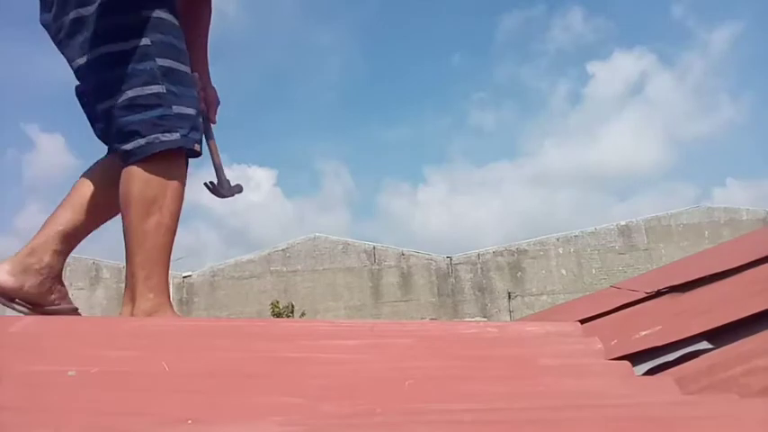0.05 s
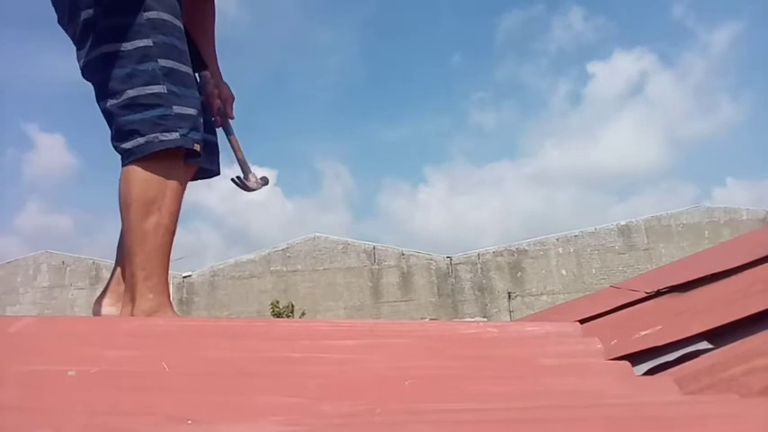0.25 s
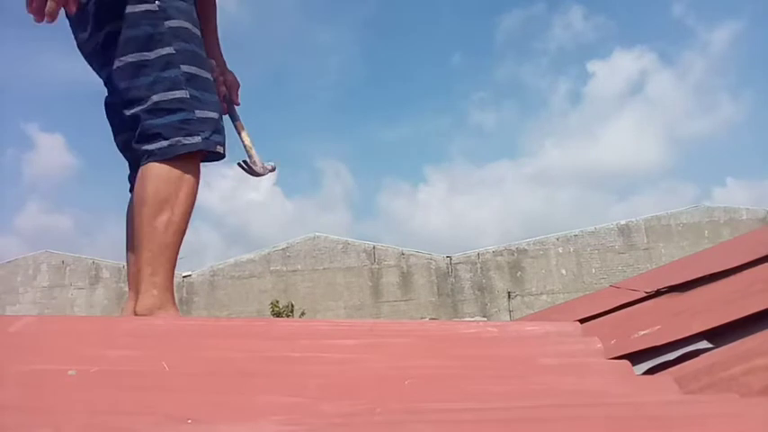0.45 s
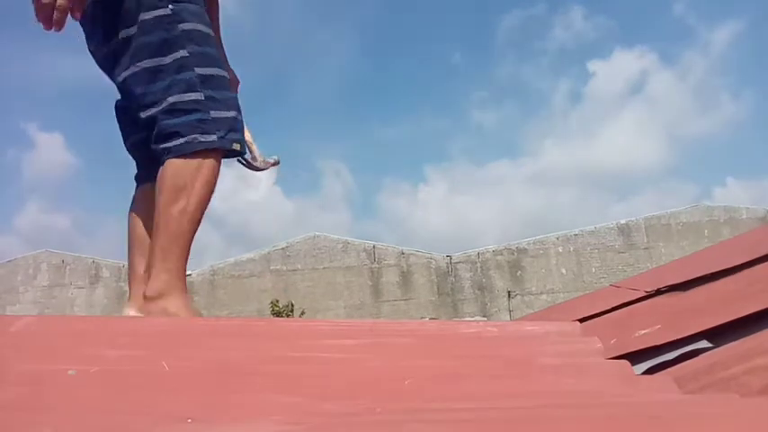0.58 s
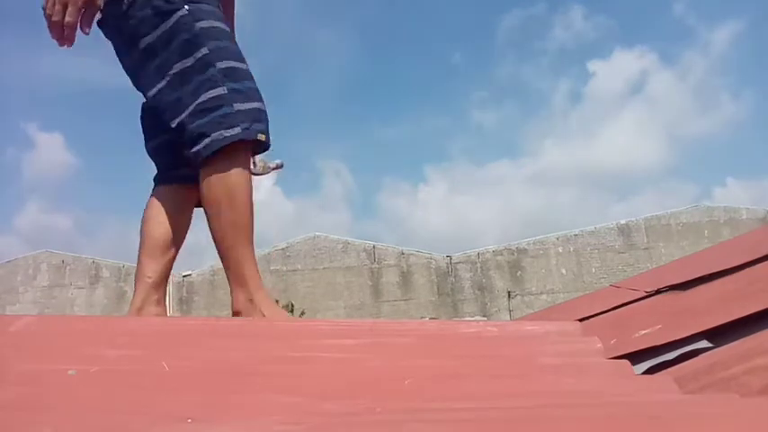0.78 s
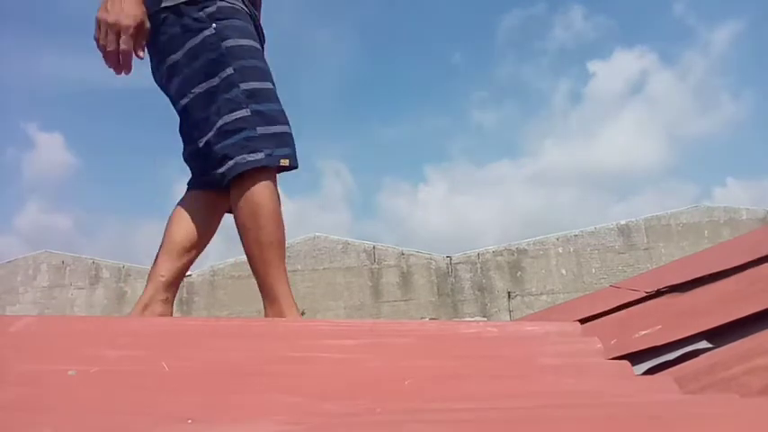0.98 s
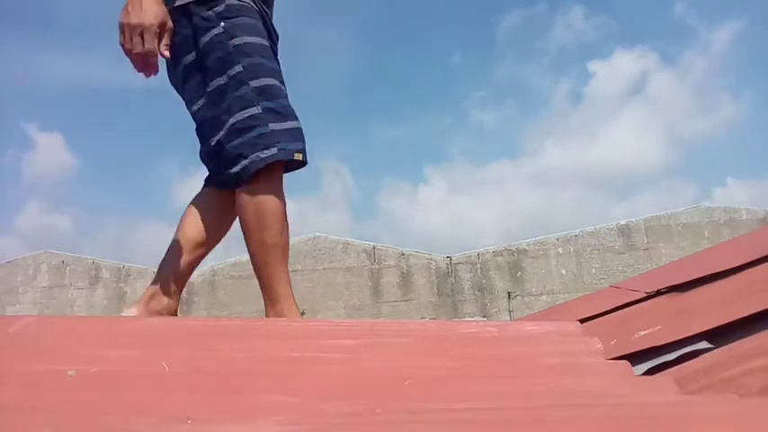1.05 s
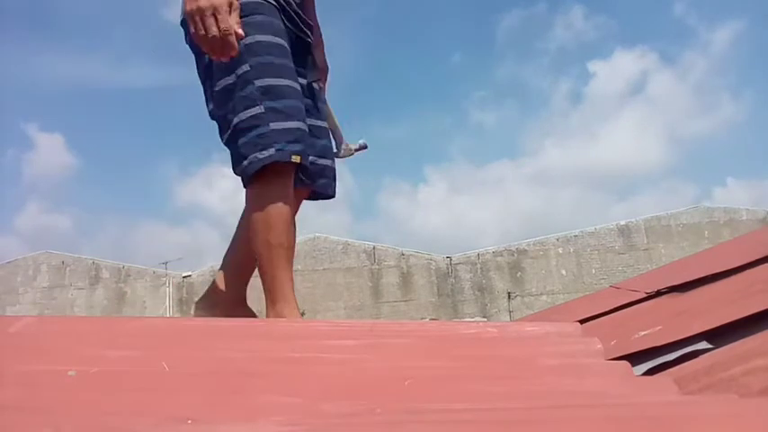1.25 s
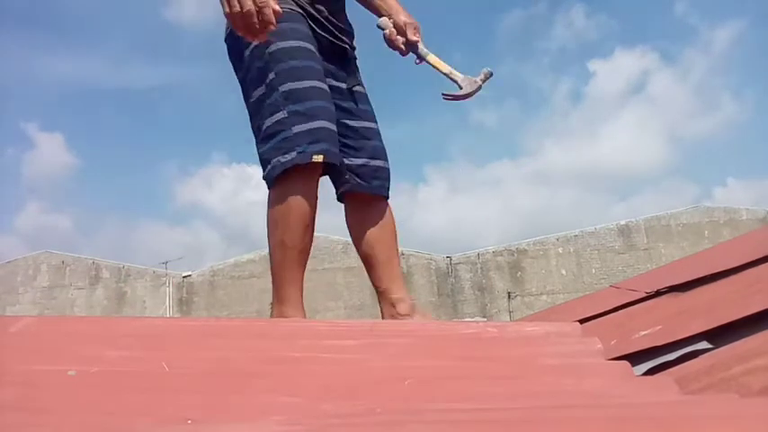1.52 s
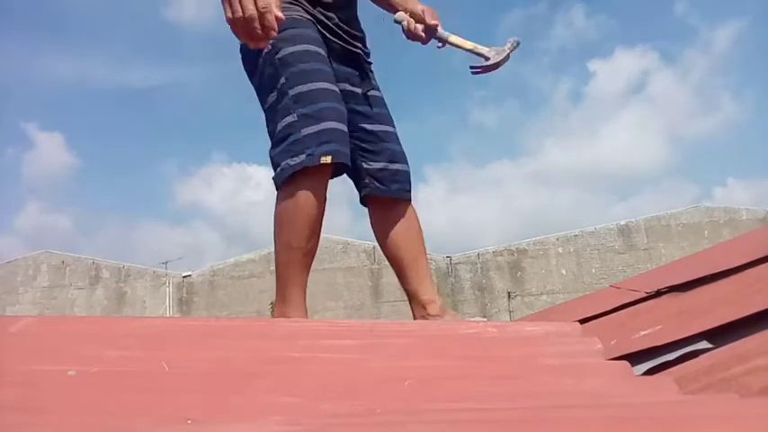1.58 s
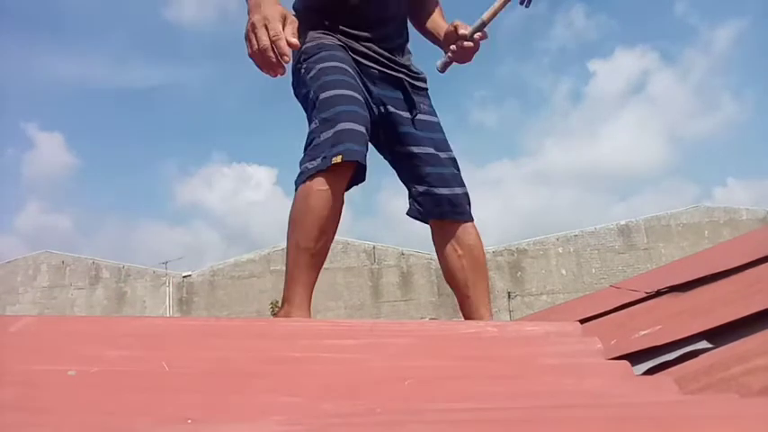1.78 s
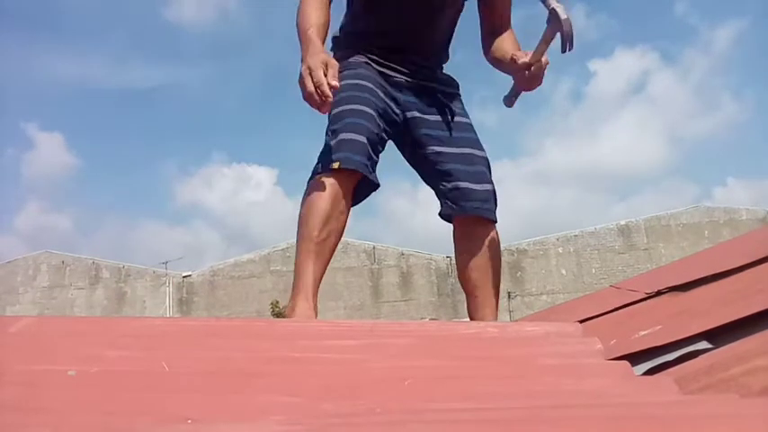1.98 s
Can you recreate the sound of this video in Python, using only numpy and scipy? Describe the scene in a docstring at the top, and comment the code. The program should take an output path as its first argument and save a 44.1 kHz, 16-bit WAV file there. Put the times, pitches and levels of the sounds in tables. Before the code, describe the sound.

A sheet-metal roof bangs under a barefoot man's weight outdoors. Faint distant birds and a brief whine come first. From about 0.2 to 0.8 seconds the sheets buckle in loud, rattling bangs and hollow pops. Softer steps tick and knock from 0.9 to 1.6 seconds, with another faint chirp. A heavy step booms around 1.7, and a scrape swells near 2 seconds. A low rumble and faint hum continue throughout.

```python
"""A barefoot man walks over a sheet-metal roof outdoors. At first far birds and a brief whine sound over
a low rumble and a faint hum, which last throughout. Then the sheets buckle under his weight in a run of
loud, rattling bangs and hollow pops, each blow exciting the metal's crowded modes. Softer steps follow,
ticking, knocking and brushing the sheet. A bird calls again, a heavy step booms in the low modes of the
frame, and at the end a scrape swells."""
import sys
import numpy as np
from scipy import signal
from scipy.fft import rfft, irfft, next_fast_len
from scipy.io import wavfile

SR = 44100
rng = np.random.default_rng(int(sys.argv[2]) if len(sys.argv) > 2 else 0)


def wav_record(signal):
    """Record a signal, one row per channel, as 16-bit PCM in the file named by sys.argv[1]."""
    frames = np.transpose(np.atleast_2d(signal))
    bounded = np.clip(frames, -1, 1)
    # unit amplitude maps onto the largest positive 16-bit level
    quanta = np.round(bounded * 32767).astype(np.int16)
    wavfile.write(sys.argv[1], SR, quanta)


N = 90404
RING_SIZE = 44100  # samples given to each blow

# buckling of the sheets: start_s, level_db, bass_db, treble_db, rattle_s
BANGS = [(0.236, -17, 6.5, 7, 0.0046), (0.2435, -15.5, 6.5, 7, 0.0024), (0.2545, -13, -8.5, 2.5, 0.0041),
         (0.274, -18.5, -11.5, -1.5, .005), (0.3165, -25, -1.5, -1, 0.02), (0.3538, -11.5, -4.5, 2, 0.0033),
         (0.362, -15, -13, -8, 0.0018), (0.4065, -17, -10, 0, 0.014), (0.4545, -20.5, 1.5, 15, 0.0053),
         (0.4605, -9, -18, -8, 0.0055), (0.474, -14.5, -10.5, -5, 0.01),
         (0.5255, -13.5, -14.5, -2.5, 0.013), (0.5832, -12, -7, -13.5, 0.0013),
         (0.612, -19.5, -7, -11, 0.0011), (0.6897, -18, -1.5, -9, 0.0033), (0.697, -28.5, -3, -1, 0.006),
         (0.7385, -24, 2, -32, 0.002)]
# soft footfalls and creaks: start_s, level_db, bass_db, treble_db, rattle_s
STEPS = [(0.917, -48, 10, -7, 0.0042), (0.95, -43, 9.5, 1, 0.028), (0.9925, -25.5, -2.5, -19, 0.0043),
         (1.143, -40.5, 16.5, 7, 0.01), (1.167, -24.5, -11.5, -12.5, 0.011), (1.278, -41, 11, -23, 0.015),
         (1.3815, -39, 6.5, -28, 0.003), (1.556, -46.5, 7, -13.5, 0.0026)]
# heavy step over the frame: start_s, level_db, bass_db, treble_db, rattle_s, weight_db
THUDS = [(1.683, -35, 0, -11, 0.014, -33.5), (1.6965, -31.5, 1.5, -8.5, 0.016, -22.5),
         (1.7505, -29, 5.5, 0, 0.0022, -32), (1.772, -38.5, -4.5, 5, 0.0071, -33.5)]
# spectral envelope of each kind of blow: frequency_hz, gain_db
BANG_COLOUR = [(30, -34), (130, -9.5), (280, -9.5), (400, 0), (800, 2), (1450, 0.5), (2500, -6),
               (3400, -13), (4200, -20.5), (7000, -35.5), (8800, -36.5), (10500, -51), (15500, -53)]
STEP_COLOUR = [(40, -34), (130, -8), (270, -12), (450, 2.5), (1300, -4.5), (4000, -29), (6000, -50.5),
               (15000, -82)]
THUD_COLOUR = [(35, -35), (72, -5.5), (220, -5.5), (900, -6), (2000, -16.5), (3300, -29), (5500, -60.5),
               (15000, -94)]
# prominent modes of the sheet: pitch_hz, relative_db
SHEET_MODES = [(579, 5.5), (1255, 0.5), (1436, -15), (1724, 3.5), (2301, 4), (2401, 6)]
# ring time of the sheet by band: centre_hz, t60_s
RING_T60 = [(150, 3.33), (450, 0.84), (1400, 0.56), (3200, 0.51), (5000, 0.34)]
# panels popping through: start_s, pitch_hz, level_db
POPS = [(0.238, 355, -17), (0.242, 527.3, -13.5), (0.288, 454.5, -22), (0.397, 775, -20.5),
        (0.409, 401.6, -20.5), (0.478, 772, -21), (0.497, 637, -21.5)]
# modes of the frame: pitch_hz, relative_db, t60_s
FRAME_MODES = [(81.6, 6, 0.15), (101.5, -9.5, 1), (190, 16.5, 0.048), (355, 0, 0.47)]
# bare soles brushing the sheet: middle_s, half_length_s, level_db
SCUFFS = [(0.99, 0.023, -67), (1.702, 0.043, -70), (1.77, .025, -68.5), (1.83, 0.019, -67)]
# spectral envelopes of the friction noises: frequency_hz, gain_db
SCUFF_COLOUR = [(500, -1), (3000, 6), (9000, -13), (15000, -20)]
SCRAPE_COLOUR = [(100, -17), (1200, 5.5), (3000, -5), (5000, -28), (8500, -42), (11000, -48)]
# far bird calls: start_s, length_s, start_hz, end_hz, level_db
CHIRPS = [(0.0, 0.034, 4230, 3800, -58.5), (0.02, 0.021, 2850, 2140, -58),
          (0.083, 0.062, 3790, 3950, -58.5), (0.137, 0.0384, 2655, 2160, -54),
          (1.523, 0.059, 2620, 2130, -58)]
# spectral envelope of the outdoor noise: frequency_hz, gain_db
AIR_COLOUR = [(25, -21), (68, 1), (190, 3), (300, -7), (2500, -20.5), (4000, -31.5), (4800, -45.5),
              (15000, -67)]
# course of the outdoor noise above the bass: time_s, gain_db
RUSH_LEVEL = [(0.0, 10.5), (0.191, 1.5), (0.23, -3), (1.2, 0), (1.62, -1)]


def blows(table, envelope, modes, ring_db, decay_s, snap_db):
    """Impact excitation: each blow snaps, chatters and rings the sheet; long rattles start softly."""
    out, t = np.zeros(N + RING_SIZE), np.arange(RING_SIZE) / SR
    for start, db, bass_db, treble_db, rattle_s, *_ in table:
        attack_s = 0.084 * rattle_s
        force = (1 - np.exp(-t / attack_s)) * np.exp(-np.maximum(t - rattle_s, 0) / decay_s)
        ring = sheet_ring(modes, force ** 2) * np.sqrt(np.sum(force ** 2) / (SR * decay_s))
        crack = snap() * undb(snap_db) * np.exp(-rattle_s / decay_s)
        blow = crack + force * chatter() + undb(ring_db) * ring
        i = int(start * SR)
        out[i:i + RING_SIZE] += undb(db) * fade() * colour(blow, envelope, bass_db, treble_db)
    return out[:N]


def snap(spread_s=0.002595):
    """Dispersion of bending waves: the treble travels fastest, so a click spreads into a falling chirp."""
    hz = np.arange(RING_SIZE // 2 + 1) * SR / RING_SIZE
    group_delay = spread_s * rng.uniform(0.8, 1.2) / np.sqrt(1 + hz / 500)
    phase = -2 * np.pi * np.cumsum(group_delay) * SR / RING_SIZE
    return irfft(np.exp(1j * phase)) * np.sqrt(spread_s * SR)


def chatter(median_clicks_per_s=650, spread_db=2, grind_db=-4.5):
    """Intermittent contact: overlapping sheets clack at uneven intervals and grind in between."""
    rate = median_clicks_per_s * np.exp(0.5 * wander(525, RING_SIZE))
    contacts = np.diff(np.floor(np.cumsum(rate) / SR), prepend=0)
    clicks = contacts * rng.choice([-1, 1], RING_SIZE) * undb(spread_db * rng.standard_normal(RING_SIZE))
    clacks = irfft(rfft(clicks) * rfft(snap()))
    return unit(unit(clacks) + undb(grind_db) * rng.standard_normal(RING_SIZE))


def sheet_modes(mean_spacing_hz=5.6):
    """Constant modal density of a thin plate: a random crowd of modes, with a few prominent ones."""
    size = RING_SIZE // 2 + 1
    modes = (rng.random(size) < SR / RING_SIZE / mean_spacing_hz) * rng.uniform(0.49, 1, size)
    modes /= np.linalg.norm(modes)
    for hz, db in SHEET_MODES:
        modes[round(hz * RING_SIZE / SR)] = undb(db - 27.5)
    return modes


def sheet_ring(modes, power, flex_depth=0.01986, flex_per_s=22.04):
    """Damped resonance: the modes store the energy of a contact and lose it again, the treble first."""
    hz = np.arange(len(modes)) * SR / RING_SIZE
    spectrum = modes * np.exp(2j * np.pi * rng.random(len(modes)))
    spectrum /= np.std(irfft(spectrum))
    flexed_clock = np.cumsum(1 + flex_depth * wander(flex_per_s, RING_SIZE))
    out = 0
    for centre, t60 in RING_T60:
        band_weight = along([(f, f == centre) for f, _ in RING_T60], hz)
        band = irfft(spectrum * band_weight)
        if centre < 1000:  # the low modes waver as the sheet bends
            band = np.interp(flexed_clock, np.arange(RING_SIZE), band)
        energy_kept = undb(-60 / (t60 * SR)) ** 2  # per sample
        energy = signal.lfilter([1], [1, -energy_kept], power / power.sum())
        out = out + band * np.sqrt(energy)
    return out


def pops(swell_s=0.0033, t60_s=0.14, wobble_depth=0.02, wobble_per_s=42):
    """Snap-through buckling: a panel gives way with a hollow, wobbling tone pitched by its tension."""
    out, t = np.zeros(N + RING_SIZE), np.arange(RING_SIZE) / SR
    shape = (1 - np.exp(-(t / swell_s) ** 2)) * undb(-60 * t / t60_s)
    for start, hz, db in POPS:
        pitch = hz * (1 + wobble_depth * wander(wobble_per_s, RING_SIZE))
        i = int(start * SR)
        out[i:i + RING_SIZE] += undb(db) * shape / shape.max() * sine(pitch)
    return out[:N]


def frame_boom(gain_db=-6.5, attack_s=0.0023):
    """Free vibration: the weight behind each thud sets the frame's low modes swinging."""
    out, t = np.zeros(N + RING_SIZE), np.arange(RING_SIZE) / SR
    shape = (1 - np.exp(-(t / attack_s) ** 2)) * fade()
    for start, *_, weight_db in THUDS:
        swing = 0
        for hz, mode_db, t60 in FRAME_MODES:
            pitch = hz * (1 + 0.0085 * rng.standard_normal())
            swing += undb(mode_db - 60 * t / t60) * np.sin(2 * np.pi * pitch * t)
        i = int(start * SR)
        out[i:i + RING_SIZE] += undb(weight_db + gain_db) * shape * swing
    return out[:N]


def scuffs():
    """Friction noise: skin brushes painted metal in short, soft swells."""
    contact = sum(undb(db) * swell_at(middle, half_length) for middle, half_length, db in SCUFFS)
    return colour(rng.standard_normal(N), SCUFF_COLOUR) * contact


def scrape(peak_s=2.013, rise_db_per_s=122, peak_db=-36):
    """Sliding friction: a gritty noise on the sheet swells as the weight shifts."""
    grit = unit(rng.standard_normal(N) * undb(1.3 * wander(400, N)))
    until_peak_s = np.maximum(peak_s - np.arange(N) / SR, 0)
    return colour(grit, SCRAPE_COLOUR) * undb(peak_db - rise_db_per_s * until_peak_s)


def birds(waver_depth=0.05, waver_per_s=1200):
    """Frequency modulation: each far call is a short glide, roughened by a fast waver in pitch."""
    out = np.zeros(N)
    for start, length, start_hz, end_hz, db in CHIRPS:
        size, i = int(length * SR), int(start * SR)
        pitch = np.linspace(start_hz, end_hz, size) * (1 + waver_depth * wander(waver_per_s, size))
        out[i:i + size] += 2 * undb(db) * np.hanning(size) * sine(pitch)
    return out


def whine(pitch_hz=1030, level_db=-49.5):
    """A pure tone under a Gaussian envelope: faint, brief and distant."""
    tone = np.sin(2 * np.pi * pitch_hz * np.arange(N) / SR)
    return undb(level_db) * swell_at(middle_s=0.146, half_length_s=0.036) * tone


def outdoors(air_db=-48, split_hz=300, hum_hz=215, hum_db=-52):
    """Ambient noise: the town's low rumble, a changing rush above it and a wavering hum."""
    air = colour(rng.standard_normal(N), AIR_COLOUR) * undb(air_db + 0.5 * wander(10.3, N))
    rumble = signal.sosfilt(signal.butter(3, split_hz, "low", fs=SR, output="sos"), air)
    rush = signal.sosfilt(signal.butter(3, split_hz, "high", fs=SR, output="sos"), air)
    rush *= undb(np.interp(np.arange(N) / SR, *np.array(RUSH_LEVEL).T))
    hum = sine(hum_hz * (1 + 0.0098 * wander(15.45, N))) * undb(hum_db + 2 * wander(11, N))
    return rumble + rush + hum


def colour(x, points, bass_db=0, treble_db=0):
    """Minimum-phase filter: a spectral envelope of unit power, times a bass and a treble shelf."""
    size = 2 * next_fast_len(len(x) // 2 + 2048)
    hz = np.arange(size // 2 + 1) * SR / size
    shelves_db = bass_db / (1 + (hz / 620) ** 3) + treble_db * hz ** 4 / (hz ** 4 + 3900 ** 4)
    gain = unit(undb(along(points, hz))) * undb(shelves_db)
    cepstrum = irfft(np.log(gain))
    cepstrum[1:size // 2] *= 2  # folding onto positive time makes the filter causal
    cepstrum[size // 2 + 1:] = 0
    return irfft(rfft(x, size) * np.exp(rfft(cepstrum)))[:len(x)]


def along(points, hz):
    """Interpolation of a table on a log-frequency axis."""
    frequencies, values = np.array(points, float).T
    return np.interp(np.log(hz + 1), np.log(frequencies), values)


def wander(per_s, size):
    """Interpolated noise with a spread near 1."""
    return 1.2 * np.interp(np.arange(size) * per_s / SR, np.arange(4096), rng.standard_normal(4096))


def sine(hz):
    """A tone whose phase is the integral of its frequency."""
    return np.sin(2 * np.pi * np.cumsum(hz) / SR)


def swell_at(middle_s, half_length_s):
    """A Gaussian rise and fall around a moment."""
    return np.exp(-((np.arange(N) / SR - middle_s) / half_length_s) ** 2)


def fade():
    """A taper over the last quarter of a ring."""
    return np.minimum(np.linspace(4, 0, RING_SIZE), 1) ** 2


def undb(db):
    """Decibels to amplitude ratio."""
    return 10 ** (np.asarray(db) / 20)


def unit(x):
    """Normalisation to rms 1."""
    return x / np.sqrt(np.mean(x ** 2))


def scene():
    """Superposition: all blows ring the same sheet and add to the other sources in one channel."""
    modes = sheet_modes()
    roof = (blows(BANGS, BANG_COLOUR, modes, ring_db=-6, decay_s=0.021, snap_db=0)
            + blows(STEPS, STEP_COLOUR, modes, ring_db=-7, decay_s=0.035, snap_db=1)
            + blows(THUDS, THUD_COLOUR, modes, ring_db=-8, decay_s=0.027, snap_db=1)
            + pops() + frame_boom())
    return (roof + scuffs() + scrape() + birds() + whine() + outdoors())[None]


def record(dry, bottom_hz=48, top_hz=15600):
    """Band limiting and saturation: the phone drops deep bass, rounds the peaks and cuts the top."""
    thin = signal.sosfilt(signal.butter(3, bottom_hz, "high", fs=SR, output="sos"), dry)
    rounded = np.tanh(0.56 * thin) / 0.64
    return signal.sosfilt(signal.ellip(8, 0.2, 70, top_hz, fs=SR, output="sos"), rounded)


dry = scene()
out = record(dry)
wav_record(out)
```